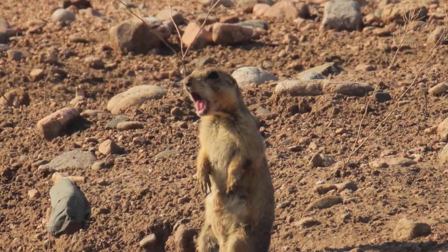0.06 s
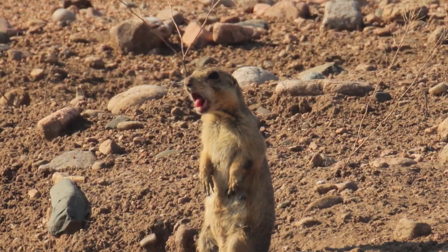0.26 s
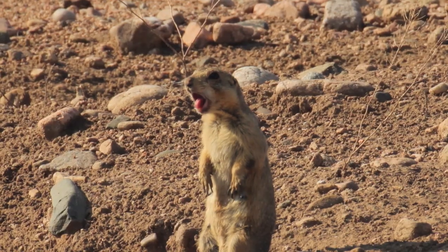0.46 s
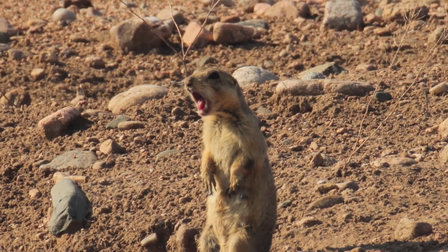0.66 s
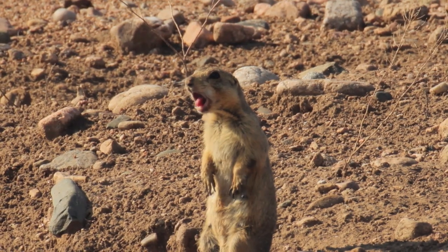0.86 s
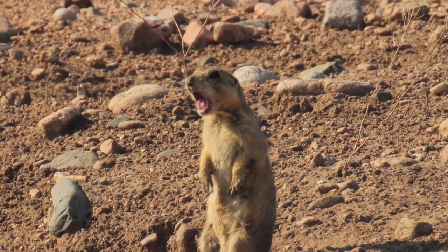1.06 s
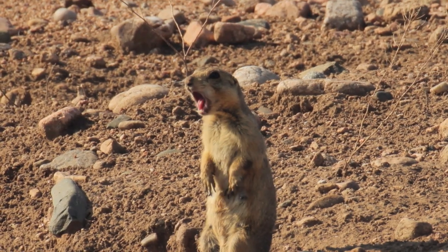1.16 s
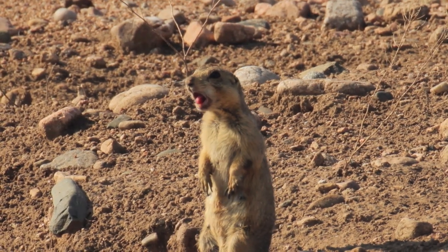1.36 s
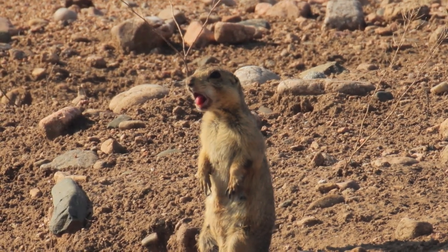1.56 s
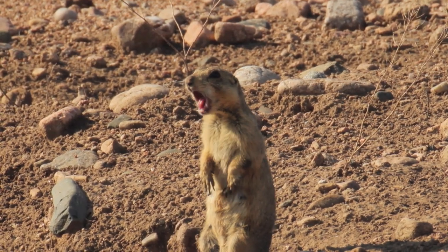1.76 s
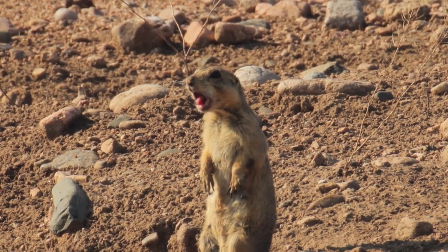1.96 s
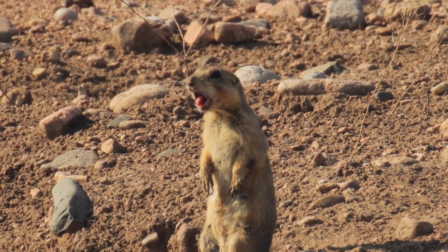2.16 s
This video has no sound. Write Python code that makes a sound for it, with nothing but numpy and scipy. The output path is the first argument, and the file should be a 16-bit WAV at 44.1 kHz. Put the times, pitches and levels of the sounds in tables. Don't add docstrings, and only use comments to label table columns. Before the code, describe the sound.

A prairie dog gives four short, piercing yips about half a second apart, the last weaker, with quick ground scatter and faint echo. Soft distant traffic and hiss continue; a single microphone is heard on the left only.

```python
import sys
import numpy as np
from scipy import signal
from scipy.fft import rfft, irfft, next_fast_len
from scipy.io import wavfile
from scipy.ndimage import uniform_filter1d, map_coordinates

SR = 44100
rng = np.random.default_rng(int(sys.argv[2]) if len(sys.argv) > 2 else 0)


def ratio_of_db(decibels):
    return 10 ** (np.asarray(decibels, float) / 20)


def digitize_waveform(pressure):
    field = np.atleast_2d(pressure).T
    bounded = np.clip(field, -1, 1)
    quanta = np.round(bounded * 32767).astype(np.int16)
    wavfile.write(sys.argv[1], SR, quanta)


N = 97020

# t/s, f/Hz, level/dB
BARK_PATHS = [
    [(.197, 544, -33.5), (.204, 652, -28.5), (.211, 840, -21), (.22, 980, -20.5), (.233, 1044, -21),
     (.248, 1051, -22), (.275, 1012, -24.5), (.3, 909, -26.5), (.32, 788, -31)],
    [(.708, 545, -34), (.716, 629, -31.5), (.7235, 844, -25), (.732, 967, -21), (.744, 1039, -22.5),
     (.759, 1044, -25), (.783, 1022, -25.5), (.81, 916, -28), (.83, 799, -31.5)],
    [(1.217, 530, -31), (1.225, 620, -28), (1.232, 831, -21.5), (1.24, 943, -20), (1.253, 1027, -21.5),
     (1.268, 1040, -25), (1.29, 1018, -25), (1.318, 903, -28.5), (1.338, 788, -33)],
    [(1.808, 530, -38), (1.817, 689, -30), (1.826, 851, -28), (1.834, 981, -28), (1.845, 1037, -24.5),
     (1.859, 1055, -26.5), (1.88, 1021, -30), (1.905, 910, -32.5), (1.928, 768, -36)],
]
HEAD_TURN_DB = (-1, 0, -0.5, -4)
ALTERNATION_DB = (5.5, 3, 5, 2.5)
ALTERNATION_HZ = (590, 660, 790, 900)
MOUTH_CLOSING_S = (.055, .115)
# f/Hz, level/dB
OPEN_MOUTH = [(1000, -20), (2200, -10), (3300, -1.5), (4300, -9.5), (6400, -14), (8600, -23), (11500, -26),
              (14000, -41.5)]
# f/Hz, level/dB
NARROW_MOUTH = [(1000, -18.5), (2400, -2), (3000, -5.5), (3650, 3), (4500, -9.5), (7300, -13.5),
                (9800, -29.5), (14000, -40)]
# f/Hz, width/Hz, depth/dB
OPEN_CAVITIES = [(1720, 250, 20), (7300, 380, 10), (10600, 650, 17), (12400, 450, 11)]
# f/Hz, width/Hz, depth/dB
NARROW_CAVITIES = [(1750, 300, 24), (6200, 450, 9), (8900, 400, 15), (11600, 450, 12)]
# f/Hz, t60/s
SLOPE_DECAY = [(1500, 0.21), (3500, 0.56), (6000, 0.45), (12000, .12)]
# t/s, length/s, first f/Hz, last f/Hz, level/dB
FAR_WHISTLES = [
    (.895, 0.027, 3700, 3930, -52),
    (.935, .03, 3950, 3650, -56),
    (1.65, 0.044, 3200, 3400, -58),
    (1.698, 0.049, 3450, 2880, -50.5),
    (1.965, 0.045, 3150, 3140, -55),
    (2.05, 0.056, 3140, 3170, -56),
    (2.125, .03, 3150, 3120, -53),
]
# t/s, level/dB
GRASS_STIR = (2.1, -53)
# f/Hz, level/dB per Hz
GRASS_COLOUR = [(2500, -40), (3200, -12), (3900, 1), (4200, 2), (4500, -25), (6000, -60)]
# t/s, length/s, level/dB
WIND_PUFF = (2.145, 0.024, -30.5)
# f/Hz, level/dB
PUFF_COLOUR = [(26, -30), (40, 0), (75, -3), (130, -30), (400, -70)]
# f/Hz, level/dB per Hz
TRAFFIC_COLOUR = [(25, -18.5), (105, 0.5), (270, -4), (430, -12), (900, -9.5), (1380, -16), (1600, -21.5),
                  (4000, -31.5)]
# f/Hz, level/dB
MOTOR_LINE = (1089, -55)
# f/Hz, level/dB per Hz
HISS_COLOUR = [(20, -19), (90, 5.5), (400, 6), (3000, 5.5), (6000, 2), (16000, 1.5)]
INPUT_HISS_DB = (-51.5, -50)

CLEAR_HZ, CREAK_HZ = (960, 830), (700, 680)
JITTER_CLEAR, JITTER_ROUGH = .0035, .05
BREATH_CLEAR, BREATH_ROUGH = .06, .22
SCATTER_DB, STEADY_DB = 1.8, .5
VOICE_DB = 6
RELEASE_S, RELEASE_PITCH, RELEASE_DB = .035, .78, -24

STONES_DB, STONES_T60_S, STONES_START_S = -12.5, .03, .0007
ECHO_DB, ECHO_START_S = -28.5, .012
TRAFFIC_DB = -36.5
BUZZ_HZ, BUZZ_WIDTH_HZ, BUZZ_FLICKER_DB = 990, 200, 3
FADE_S, TOP_HZ = 0.039, 15740


def unit(x):
    return x / np.sqrt(np.mean(x ** 2) + 1e-20)


def along(points, hz):
    f, v = np.transpose(points)
    return np.interp(np.log(hz + 1), np.log(f + 1), v)


def wobble(rate):
    knots = rng.standard_normal(int(N * rate / SR) + 4)
    return map_coordinates(knots, [np.arange(N) * rate / SR])


def filtered(x, response):
    m = next_fast_len(len(x) + 8192)
    return irfft(rfft(x, m) * response(np.fft.rfftfreq(m, 1 / SR)), m)[:len(x)]


def noise(spectrum):
    return unit(filtered(rng.standard_normal(N), lambda hz: ratio_of_db(along(spectrum, hz))))


def vocal_folds(pitch, cycles, rough, voiced_s, alternate_db):
    t = np.arange(len(pitch)) / SR
    k = np.arange(1, int(np.interp(voiced_s, t, cycles)))
    luck = rng.standard_normal((len(k), 2))
    at = np.interp(k, cycles, np.arange(len(t)))
    i = at.astype(int)
    uneven = np.interp(pitch[i], ALTERNATION_HZ, (0, 1, 1, 0)) * (at < np.argmax(pitch))
    size_db = (STEADY_DB + SCATTER_DB * rough[i]) * luck[:, 0]
    size_db = size_db + alternate_db * uneven * ((-1.) ** k - .6)
    jitter = (JITTER_CLEAR + JITTER_ROUGH * rough[i]) * luck[:, 1]
    at = np.abs(at + jitter * SR / pitch[i]) + 8
    size = ratio_of_db(size_db) * np.sqrt(SR / pitch[at.astype(int)])
    near = at.astype(int)[:, None] + np.arange(-7, 9)
    d = near - at[:, None]
    weights = np.sinc(d) * np.cos(np.pi * d / 16) ** 2 * size[:, None]
    return np.bincount(near.ravel(), weights.ravel(), len(t))


def tract(points, dips, dull_db):
    hz = np.fft.rfftfreq(2048, 1 / SR)
    db = along([(500, points[0][1] - 24), *points, (20000, points[-1][1] - 30)], hz)
    db = db - sum(deep * np.exp(-.5 * ((hz - c) / w) ** 2) for c, w, deep in dips)
    db = db + dull_db * np.log2(np.maximum(hz / 3500, 1))
    cepstrum = irfft(np.log(ratio_of_db(db)))
    causal = np.concatenate([cepstrum[:1], 2 * cepstrum[1:1024], np.zeros(1024)])
    h = irfft(np.exp(rfft(causal)))[:1024]
    return h / np.linalg.norm(h)


def mouth(source, t, dull_db):
    shut = np.interp(t, MOUTH_CLOSING_S, (0, 1))
    out = 0
    for u in np.arange(5) / 4:
        shape = (1 - u) * np.array(OPEN_MOUTH) + u * np.array(NARROW_MOUTH)
        dips = (1 - u) * np.array(OPEN_CAVITIES) + u * np.array(NARROW_CAVITIES)
        share = np.clip(1 - 4 * abs(shut - u), 0, 1)
        out = out + signal.fftconvolve(source * share, tract(shape, dips, dull_db))
    return out


def bark(rows, dull_db, alternate_db):
    release = rows[-1] * np.array([1, RELEASE_PITCH, 1]) + [RELEASE_S, 0, RELEASE_DB]
    s, hz, db = np.transpose([*rows, release])
    t, voiced_s = np.arange(round(.2 * SR)) / SR, s[-1] - s[0]

    def smooth(v, size):
        return uniform_filter1d(np.interp(t + s[0], s, v), size=size, mode="nearest")

    slow = smooth(hz, 800)
    glide = 2 * slow - uniform_filter1d(slow, size=800, mode="nearest")
    settled = np.interp(t, (.02, .04), (0, 1))
    pitch = (1 - settled) * smooth(hz, 180) + settled * glide
    falling = (np.arange(len(t)) > np.argmax(pitch)).astype(int)
    clear, creak = np.take(CLEAR_HZ, falling), np.take(CREAK_HZ, falling)
    rough = np.clip((clear - pitch) / (clear - creak), 0, 1)
    cycles = np.cumsum(pitch) / SR
    pulses = vocal_folds(pitch, cycles, rough, voiced_s, alternate_db)
    air = unit(np.diff(rng.standard_normal(len(t) + 1)))
    breath = air * (1 + np.cos(2 * np.pi * cycles)) * (t < voiced_s)
    share = np.clip(BREATH_CLEAR + BREATH_ROUGH * rough, 0, 1)
    voice = np.sqrt(1 - share ** 2) * pulses + share * breath
    return mouth(ratio_of_db(smooth(db, 180) + VOICE_DB) * voice, t, dull_db)


def stones(call):
    lag = np.arange(1200) / SR
    near = rng.standard_normal(len(lag)) * ratio_of_db(-60 * lag / STONES_T60_S) * (lag > STONES_START_S)
    return ratio_of_db(STONES_DB) * signal.fftconvolve(call, near / np.linalg.norm(near))[:len(call)]


def far_slopes(call):
    hz, t, z = signal.stft(rng.standard_normal(SR // 2), SR, nperseg=256)
    tail = signal.istft(z * ratio_of_db(-60 * t / along(SLOPE_DECAY, hz)[:, None]), SR, nperseg=256)[1]
    tail = np.pad(tail / np.linalg.norm(tail), (round(ECHO_START_S * SR), 0))
    return ratio_of_db(ECHO_DB) * signal.fftconvolve(call, tail)


def prairie_dog():
    out = np.zeros(N + SR)
    for rows, dull_db, alternate_db in zip(BARK_PATHS, HEAD_TURN_DB, ALTERNATION_DB):
        call = bark(rows, dull_db, alternate_db)
        call = call + stones(call)
        i = round(rows[0][0] * SR) - 8
        out[i:][:len(call)] += call
        wet = far_slopes(call)[:len(out) - i]
        out[i:][:len(wet)] += wet
    return out[:N]


def far_calls():
    out = np.zeros(N + SR)
    for s, length, a_hz, b_hz, db in FAR_WHISTLES:
        u = np.arange(round(length * SR)) / (length * SR)
        drift = uniform_filter1d(rng.standard_normal(len(u)), size=200)
        phase = 2 * np.pi * np.cumsum(a_hz + (b_hz - a_hz) * u) / SR + 4.9 * drift
        out[round(s * SR):][:len(u)] += ratio_of_db(db + 2) * np.sqrt(np.sin(np.pi * u)) * np.sin(phase)
    return out[:N]


def grass():
    start_s, db = GRASS_STIR
    rise = np.clip((np.arange(N) / SR - start_s) / 0.014, 0, 1)
    return rise * ratio_of_db(db + 1.9 * wobble(30)) * noise(GRASS_COLOUR)


def gust():
    s, length, db = WIND_PUFF
    swell = np.exp(-.5 * ((np.arange(N) / SR - s) / length) ** 2)
    return ratio_of_db(db) * swell * noise(PUFF_COLOUR)


def traffic():
    z = signal.stft(noise([(12, -60), *TRAFFIC_COLOUR, (5000, -36), (12000, -60)]), nperseg=512)[2]
    patches = uniform_filter1d(rng.standard_normal(z.shape), size=5, axis=0)
    patches = unit(uniform_filter1d(patches, size=10, axis=1))
    rumble = unit(signal.istft(z * ratio_of_db(1.22 * patches), nperseg=512)[1][:N])
    return ratio_of_db(TRAFFIC_DB + 0.2 * wobble(1.56)) * rumble


def motor():
    hz, db = MOTOR_LINE
    level = ratio_of_db(db + 3.8 * wobble(6.03)) * np.sqrt(2)
    return level * np.sin(2 * np.pi * hz * np.arange(N) / SR + .6 * wobble(5))


def buzz():
    out = np.zeros(N)
    for k, db in enumerate((-60.5, -63.5, -67, -73)):
        centre, width = (2 * k + 1) * BUZZ_HZ, (1 + k / 2) * BUZZ_WIDTH_HZ
        hump = filtered(rng.standard_normal(N), lambda hz: 1 / (1 + ((hz - centre) / width) ** 2))
        out += ratio_of_db(db + BUZZ_FLICKER_DB * wobble(25.05)) * unit(hump)
    return out


def electronics():
    left, right = [ratio_of_db(db) * noise(HISS_COLOUR) for db in INPUT_HISS_DB]
    return np.array([left, right + buzz()])


def scene():
    microphone = prairie_dog() + far_calls() + grass() + gust() + traffic() + motor()
    return np.array([microphone, np.zeros(N)]) + electronics()


def band_limit(x):
    return signal.sosfilt(signal.butter(12, 16650, fs=SR, output="sos"), x)


def record(dry):
    fade = np.clip((np.arange(N) / SR + 0.004) / FADE_S, 0, 1)
    mix = np.array([filtered(c * fade, lambda hz: hz < TOP_HZ) for c in dry])
    return band_limit(mix)


dry = scene()
out = record(dry)
digitize_waveform(out)
```